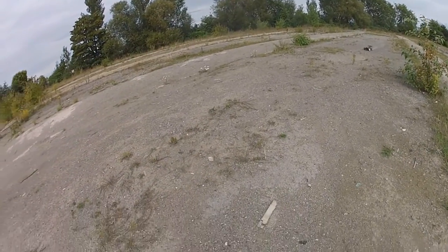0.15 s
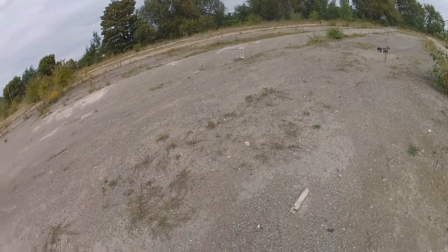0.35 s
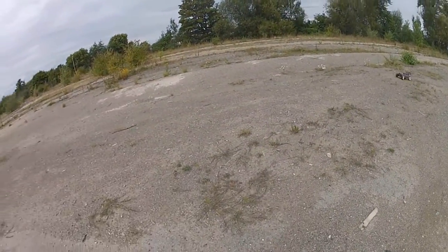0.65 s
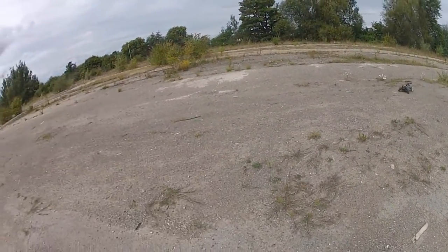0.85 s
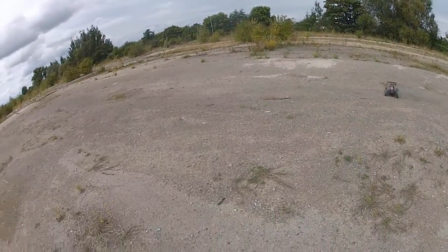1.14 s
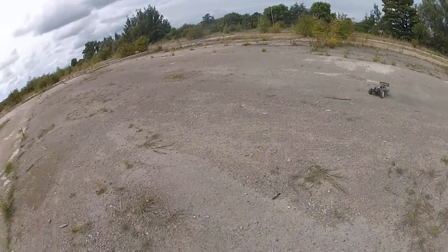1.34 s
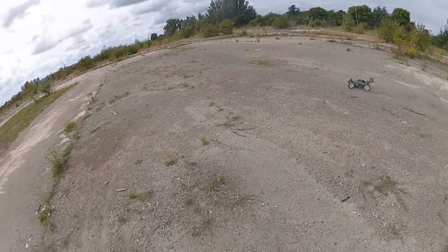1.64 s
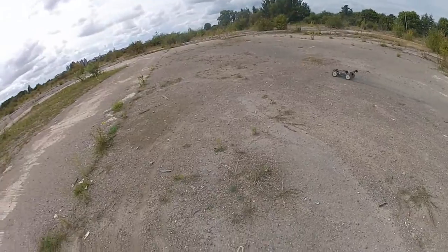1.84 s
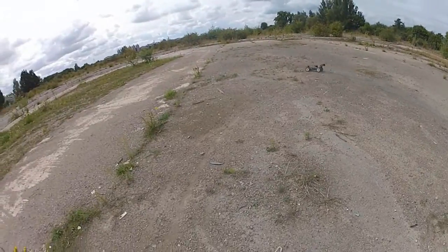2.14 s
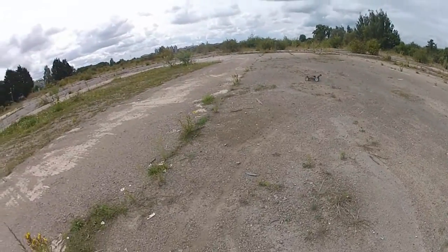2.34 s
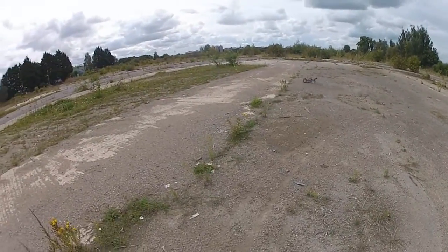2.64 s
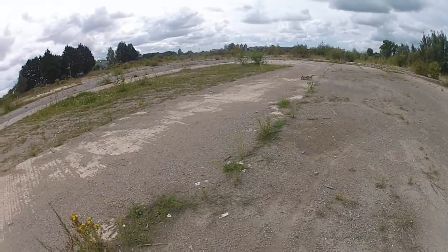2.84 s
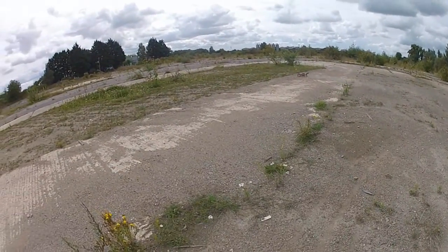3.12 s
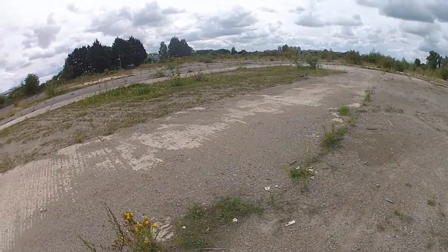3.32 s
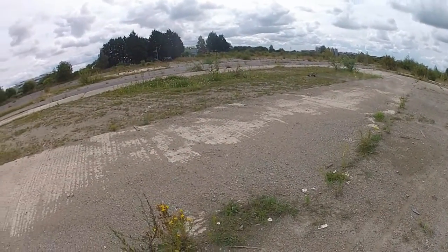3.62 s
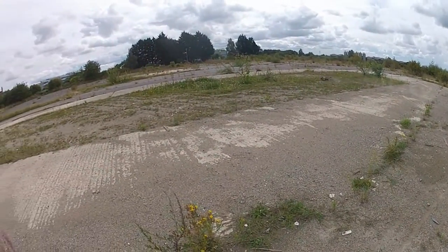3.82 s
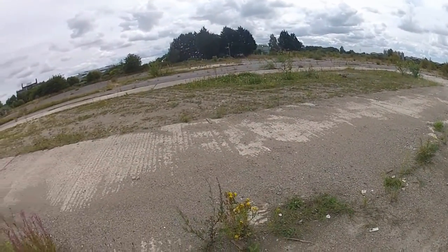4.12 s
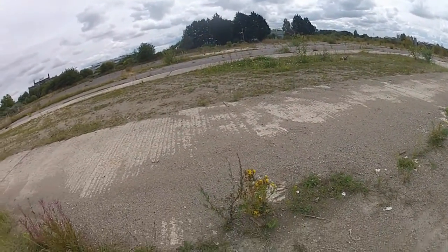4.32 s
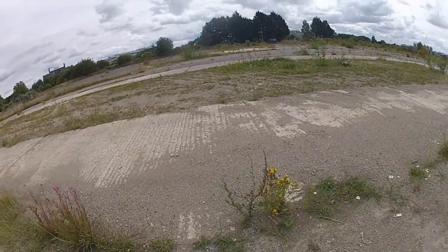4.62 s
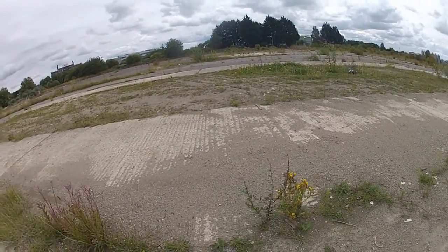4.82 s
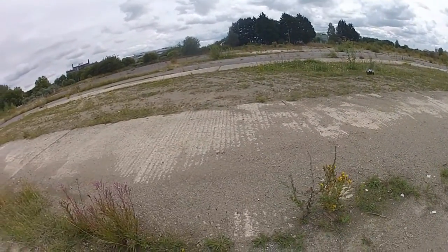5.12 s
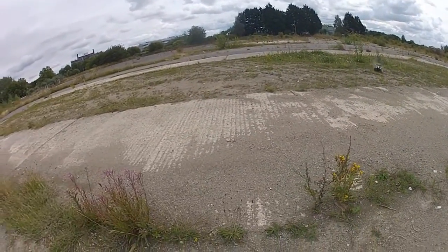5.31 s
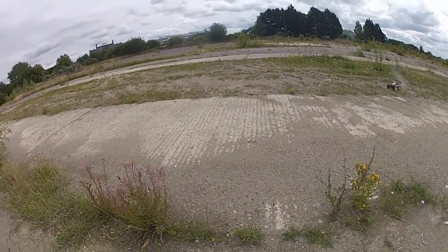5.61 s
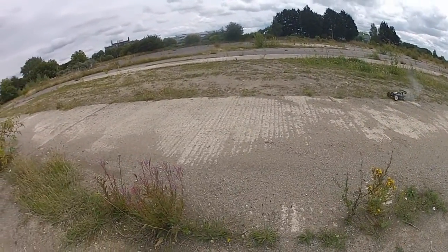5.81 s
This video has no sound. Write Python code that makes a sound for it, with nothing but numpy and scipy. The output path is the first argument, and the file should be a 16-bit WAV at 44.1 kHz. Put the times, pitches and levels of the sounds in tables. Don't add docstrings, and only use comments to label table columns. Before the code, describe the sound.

A small two-stroke model buggy screams past at high revs over gravel, twice dropping its throttle, fading away, then turning back closer.

```python
import sys
import numpy as np
from scipy import signal
from scipy.fft import rfft, irfft, next_fast_len
from scipy.io import wavfile
from scipy.ndimage import uniform_filter1d

SR = 44100
rng = np.random.default_rng(int(sys.argv[2]) if len(sys.argv) > 2 else 0)


def dump(signal):
    limited = np.clip(np.atleast_2d(signal).T, -1, 1)
    pcm = np.round(limited * 32767).astype(np.int16)
    wavfile.write(sys.argv[1], SR, pcm)


def boost_factor(decibels):
    exponent = np.asarray(decibels, float) / 20
    return 10 ** exponent


N = 262836

# t/s, nearness/dB, nose toward us (below 0 away)/1, side-on/-1..1
BUGGY_PATH = [(0, -7.5, 0.19, -0.2), (.1, -5, 0.94, -0.3), (.3, -5, 0.21, 0.1), (.5, 0.5, -0.4, 0.05),
              (.9, -1.5, -0.46, -0.12), (1.55, -0.47, .1, -0.04), (2.05, -1, -0.15, 0.14),
              (2.33, -1.5, -0.082, 0.3), (2.5, 0, -0.59, 0.11), (3.0, -0.5, -0.23, 0.12),
              (3.3, -3, -1.28, -0.04), (3.5, -8.5, -0.72, 0.41), (3.85, -9, 0.12, 0.45),
              (4.35, -11.5, .6, .7), (4.75, -10, 1, 0.49), (5.1, -9.5, 0.76, 0.15), (5.4, -4.5, 0.27, 0.15),
              (5.96, -1.5, 0.29, 0.44)]
# t/s, pipe ring f/Hz, pipe ring strength/1, upper shell ring f/Hz
PIPE_AIM = [(0, 1740, 0.43, 4360), (.33, 1670, 0.29, 4670), (.58, 2200, 0.52, 5040), (.8, 1755, 0.42, 5140),
            (1.1, 1747, 2.1, 5302), (1.45, 1840, 3, 5470), (1.62, 1970, 2.4, 5200), (1.85, 1499, 1.1, 4900),
            (2.05, 1480, 0.65, 4520), (2.56, 1980, 0.2, 4463), (2.9, 1750, 0.38, 4580),
            (3.15, 2060, 0.25, 4820), (3.55, 1850, 1.8, 4830), (4.0, 1390, 0.52, 4560),
            (4.5, 1800, 1.6, 4860), (5.3, 1800, 0.49, 4500), (5.6, 1750, 0.63, 4650),
            (5.96, 1680, 0.76, 4890)]


def evened(x):
    return x / np.sqrt(np.mean(x ** 2) + 1e-20)


def levelled(x, size=3000):
    power = uniform_filter1d(uniform_filter1d(x ** 2, size), size)
    return x / np.sqrt(power + 1e-12)


def colour(x, points):
    hz, db = np.transpose(points)
    size = next_fast_len(len(x))
    grid_hz = np.fft.rfftfreq(size, 1 / SR)
    gain_db = np.interp(np.log(grid_hz + 1), np.log(hz), db, left=-90, right=-90)
    return irfft(rfft(x, size) * boost_factor(gain_db), size)[:len(x)]


def resonate(x, hz, width_hz):
    turn = np.exp(2j * np.pi * np.cumsum(hz) / SR)
    r = np.exp(-np.pi * width_hz / SR)
    return 2 * (turn * signal.lfilter([1 - r], [1, -r], x / turn)).real


def drift(hz):
    lowpass = signal.butter(2, hz, fs=SR, output="sos")
    return evened(signal.sosfilt(lowpass, rng.standard_normal(N + SR))[SR:])


def curves(table):
    s, *columns = np.transpose(table)
    return [np.interp(np.arange(N) / SR, s, c) for c in columns]


def peaks(rows):
    t_s = np.arange(N) / SR
    return sum(np.interp(t_s, [s - abs(rise), s, s + abs(fall)], [0, top, 0])
               for s, top, rise, fall in rows)


def engine():
    # close by/dB, per nearness/(dB/dB), nose-on/dB, side-on/dB, throttle shut/dB,
    # revs/(dB/octave), flare/(dB/Hz), load/(dB/dB)
    thump_law = (-22.5, 0.91, 1, 8, -9.5, -1, 0.04, 0.07)
    low_law = (-31.5, 0.12, 0, -2, -3.5, -6, 0.0627, 1.64)
    pipe_law = (-16.5, 1, 0, -1.7, -7.5, -0.5, 0.0162, 0.23)
    rasp_law = (-18.5, 0.93, 6, 0.16, -2, 2, 0.1054, 0.59)
    valley_law = (-37.5, 1.5, 4, -4, -17, 5, 0.1634, 0)
    # f/Hz, level/dB
    low_shape = [(250, -27), (400, -4.5), (550, -11), (750, 1.5), (1050, 0), (1250, 0), (1500, -5)]
    pipe_shape = [(900, -15), (1150, -3), (1600, 6.5), (2200, 9), (2450, -1.5), (2600, -35.5), (2800, -41)]
    valley_shape = [(2350, -53), (2550, 7), (2900, -1.5), (3250, -4.5), (3500, -65)]

    hz = driving()[1]
    rough, low_rough = misfire()
    turns = np.cumsum(hz * (1 + 0.00723 * drift(25.3) + 0.015 * drift(148.6))) / SR
    cycle, phase = turns.astype(int), turns % 1
    strength = rng.standard_normal((int(turns[-1]) + 99, 3))

    pulses = -evened(sum(order(k, turns) for k in range(2, 22)))
    uneven = uniform_filter1d(strength[cycle, 2], 60)
    pulses = pulses * boost_factor(5.9 * np.minimum(rough, 0.35) * uneven)
    gate = np.exp(-phase / 2.5) * boost_factor(0.84 * strength[cycle, 0])
    puffs = evened((5.9 + gate) * rng.standard_normal(N))

    drive, low_drive = (bounce(np.sqrt(1 - r) * pulses + 1.3 * np.sqrt(r) * puffs)
                        for r in (rough, low_rough))
    ring_hz, ring, _ = curves(PIPE_AIM)
    rung = drive + ring * resonate(drive, ring_hz, 330)
    valley = levelled(colour(bounce(pulses + 0.5 * puffs), valley_shape))
    exhaust = level(low_law) * levelled(colour(low_drive, low_shape))
    exhaust = exhaust + level(pipe_law) * levelled(colour(rung, pipe_shape))
    exhaust = exhaust + level(valley_law) * boost_factor(2.7 * drift(28)) * valley

    thump = np.sqrt(2) * np.cos(2 * np.pi * turns + 0.19) * boost_factor(1.04 * drift(74))
    burst = np.exp(-phase / 0.5) * boost_factor(2.8 * strength[cycle, 1])
    spit = evened((0.5 + burst) * rng.standard_normal(N))
    return level(thump_law) * thump + exhaust + level(rasp_law) * rasp(spit + 0.5 * pulses)


def order(k, turns):
    flicker = boost_factor(1.2 * drift(22))
    return flicker * np.cos(2 * np.pi * k * turns - 0.1171 * k ** 2 + 0.61 * drift(26))


def rasp(spit):
    # t/s, f/Hz, share/0..1
    gear_whine = [(0, 4110, 0.2), (.3, 4090, 0.34), (1.0, 4000, 0.08), (1.5, 4000, 0), (1.8, 4246, .2),
                  (2.1, 4460, 0.01), (4.55, 4200, 0.04), (4.7, 4030, 0.59), (4.82, 4043, 0.67),
                  (4.9, 4246, 0.47), (5.05, 4170, 0.34), (5.14, 4487, 0.4), (5.3, 4570, 0.5),
                  (5.45, 4655, 0.1), (5.68, 4793, 0.34), (5.96, 4930, 0.08)]
    # f/Hz, level/dB
    rasp_shape = [(3000, -51), (3250, -13), (3500, -5.5), (4200, -2.5), (5000, -2), (5500, -5), (5850, -13),
                  (6000, -26)]

    spit = spit * boost_factor(1.0 * drift(9.7))
    upper_hz = curves(PIPE_AIM)[2]
    whine_hz, whine_share = curves(gear_whine)
    bright = 0.86 + 0.05 * curves(BUGGY_PATH)[1] + 0.065 * np.arange(N) / SR
    out = evened(colour(spit, rasp_shape))
    high = resonate(out, np.full(N, 5500.), 1100)
    low = resonate(out, np.full(N, 3450.), 700)
    out = out + 1.24 * (bright - 1) * (high - low)
    rings = ((4030, 0.22, 420), (upper_hz, 0.2, 420), (whine_hz, whine_share, 170))
    for hz, share, width_hz in rings:
        hz = hz * (1 + 0.008 * drift(9))
        glint = boost_factor(2.5 * drift(4))
        out = out + share * glint * evened(resonate(resonate(spit, hz, width_hz), hz, width_hz))
    return levelled(out)


def bounce(x):
    # t/s, delay/ms, share/0..1
    ground_echo = [(0, 0.99, 0.5), (.55, 1.23, 0.19), (1.5, 1.24, 0.36), (1.8, 1.305, 0.21),
                   (2.4, 1.42, 0.57), (2.85, 1.31, 0.06), (3.3, 1.43, 0.65), (3.6, 1.49, .1),
                   (3.95, 1.49, 0.56), (4.4, 1.59, 0.57), (4.8, 1.62, 0.09), (5.25, 1.58, .45),
                   (5.5, 1.22, 0.03), (5.96, 1.26, 0.65)]
    delay_ms, share = curves(ground_echo)
    at = np.arange(N)
    return x + np.clip(share, 0, 1) * np.interp(at - delay_ms * SR / 1000, at, x)


def driving():
    # t/s, f/Hz
    grip_revs = [(0, 345.4), (.9, 342.3), (1.16, 327.6), (1.66, 323.6), (1.78, 297.9), (1.86, 316),
                 (2.07, 328.2), (2.12, 280), (2.265, 211.7), (2.32, 290.6), (2.66, 315.1), (3.0, 329.2),
                 (3.17, 228.5), (3.31, 180.8), (3.45, 205.6), (3.52, 253.2), (4.8, 268.8), (5.96, 303.4)]
    # top t/s, flare/Hz, rise/s, catch/s
    wheel_hops = [(.03, 27, 0.087, 0.029), (.15, 10, 0.082, 0.055), (.28, 29.5, 0.067, 0.093),
                  (.44, 16, 0.057, 0.17), (0.681, 19, 0.031, 0.062), (0.851, 36, 0.097, 0.088),
                  (1.031, 28.5, 0.027, 0.048), (1.329, 7, .12, 0.052), (1.429, -9.5, 0.043, 0.036),
                  (1.489, 19.5, 0.045, 0.059), (2.342, 16, 0.028, 0.024), (2.411, -11, 0.048, .02),
                  (2.465, 20, .05, 0.01986), (2.52, -17, 0.042, 0.064), (2.61, 10.5, 0.039, 0.048),
                  (2.85, 11, 0.16, 0.0394), (3.0, 12, 0.048, 0.027), (3.8, 24, .08, 0.17),
                  (4.001, 20.5, 0.092, 0.062), (4.16, 13.5, 0.12, 0.084), (4.279, 18, .06, .06),
                  (4.881, 16, .08, 0.075), (4.981, 31, .07, 0.084), (5.15, 8, 0.11, .12),
                  (5.325, 36, .15, .055), (5.48, 34, 0.096, 0.024), (5.52, -10.5, .02, 0.052),
                  (5.64, 15.5, .08, .07), (5.715, 47.5, .16, 0.029), (5.91, 7, 0.072, 0.032)]
    # closing starts t/s, shut t/s, opening starts t/s, open t/s
    throttle_lifts = [
        (2.07, 2.114, 2.24, 2.28),
        (3.056, 3.153, 3.43, 3.5),
    ]
    t_s = np.arange(N) / SR
    shut = sum(np.interp(t_s, lift, [0, 1, 1, 0]) for lift in throttle_lifts)
    flare_hz = peaks(wheel_hops)
    return flare_hz, curves(grip_revs)[0] + flare_hz, shut


def misfire():
    # t/s, pipe share/0..1, low-order share/0..1
    rough_burn = [(0, .25, .12), (.8, .3, .22), (.95, .4, .4), (1.15, .18, .2), (1.6, .22, .35),
                  (2.05, .22, .45), (2.35, .3, .3), (2.65, .42, .6), (3.05, .42, .62), (3.25, .3, .15),
                  (3.55, .3, .1), (4.15, .45, .08), (4.6, .28, .08), (4.9, .15, .08), (5.96, .2, .25)]
    rough_shut = (.52, .18)
    shut = driving()[2]
    return [base + more * shut for base, more in zip(curves(rough_burn), rough_shut)]


def level(law):
    # t/s, level/dB, rise/s, fade/s
    load_swells = [(.9, 4, .12, .2), (1.16, -1, 0.054, 0.039), (2.32, 6, 0.033, 0.074),
                   (2.5, 4, 0.052, 0.079), (2.65, -0.5, 0.082, 0.33), (3.35, -4.5, 0.17, 0.15),
                   (3.55, 1.5, 0.075, 0.19), (4.97, -1.5, .1, 0.077), (5.3, -1, 0.073, .05),
                   (5.51, 3.5, 0.016, 0.073), (5.78, 2.5, .05, .1), (5.98, 3.5, 0.073, 0.065)]
    flare_hz, hz, shut = driving()
    octaves = np.log2(hz / 320)
    state = [*curves(BUGGY_PATH), shut, octaves, flare_hz, peaks(load_swells)]
    return boost_factor(law[0] + np.dot(law[1:], state))


def wind():
    # t/s, level/dB
    gust_levels = [(0, -44), (1.0, -49.5), (1.79, -58), (2.31, -51.5), (3.07, -49), (3.6, -50.5),
                   (4.42, -47.5), (4.7, -51), (5.96, -49)]
    # f/Hz, level/dB
    wind_shape = [(20, -22), (40, -9.5), (65, -4), (100, -8), (160, -34), (300, -40)]
    tyre_shape = [(60, -48), (110, -5), (180, -1.5), (280, 0), (400, -5.5), (600, -3), (900, -51)]
    # close by/dB, per nearness/(dB/dB), nose-on/dB, side-on/dB, throttle shut/dB,
    # revs/(dB/octave), flare/(dB/Hz), load/(dB/dB)
    tyre_law = (-39.5, 0.27, -2, -6.5, 3, 6, 0.1134, 0.43)
    gust = boost_factor(curves(gust_levels)[0] + 2.5 * drift(8.7))
    rumble = gust * evened(colour(rng.standard_normal(N), wind_shape))
    return rumble + level(tyre_law) * evened(colour(rng.standard_normal(N), tyre_shape))


def scene():
    return np.tile(engine() + wind(), (2, 1))


def masked(x):
    gate_floor = [(300, -60), (2000, -53), (2500, -50), (3200, -96), (4000, -48), (5900, -40.5),
                  (7500, -55), (9000, -43.5), (11500, -42), (12300, -41.5), (13000, -60), (14300, -41.5),
                  (14800, -44), (15600, -25), (22050, -10)]
    hz, _, z = signal.stft(x, SR, nperseg=2048, noverlap=1024)
    power = abs(z) ** 2
    share = uniform_filter1d(power, size=5, axis=1) / (power.sum(1, keepdims=True) + 1e-20)
    edge_hz, edge_db = np.transpose(gate_floor)
    block = np.arange(len(hz)) // 32
    offset_db = 2.5 * rng.standard_normal((len(hz) // 32 + 1, z.shape[2]))[block]
    keep = share > boost_factor(2 * (np.interp(hz, edge_hz, edge_db)[:, None] + offset_db))
    return signal.istft(z * keep, SR, nperseg=2048, noverlap=1024)[1][:, :N]


def band_limit(x):
    return signal.sosfilt(signal.butter(12, 15850, fs=SR, output="sos"), x)


def record(dry):
    # up/1, down/1 to 12 kHz, hold/steps, up/1, down/1 from 48 kHz
    hold_ratios = (40, 147, 4, 147, 160)
    up, down, hold, back_up, back_down = hold_ratios
    dry = 1.15 * np.tanh(dry / 1.15)
    padded = np.pad(dry, ((0, 0), (0, down)))
    coarse = signal.resample_poly(padded, up, down, axis=1, window=("kaiser", 8.0))
    held = np.repeat(coarse, hold, axis=1)
    held = signal.resample_poly(held, back_up, back_down, axis=1)[:, :N]
    return band_limit(masked(held))


dry = scene()
out = record(dry)
dump(out)
```